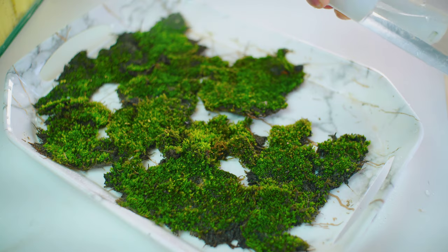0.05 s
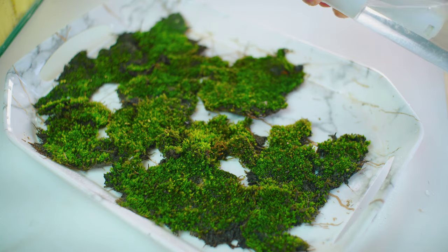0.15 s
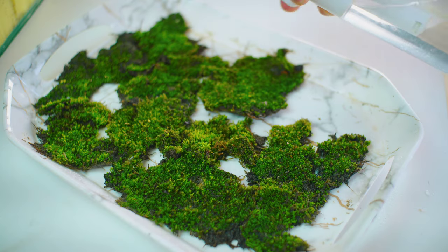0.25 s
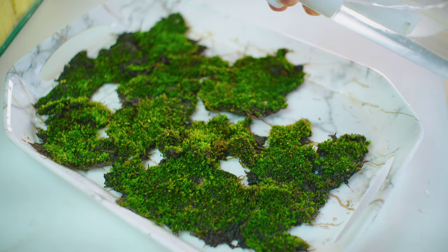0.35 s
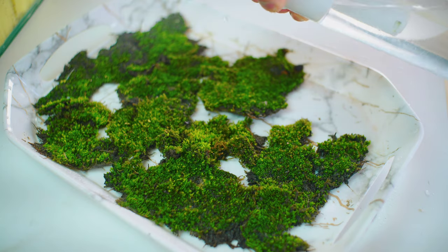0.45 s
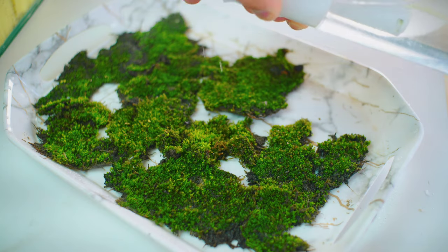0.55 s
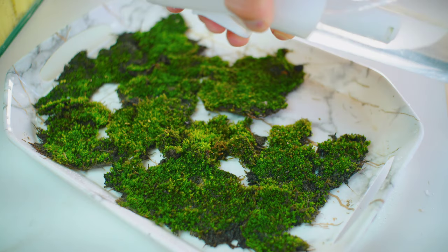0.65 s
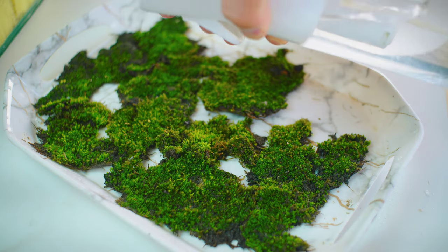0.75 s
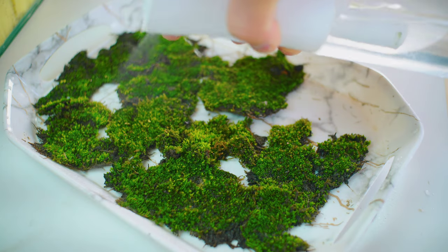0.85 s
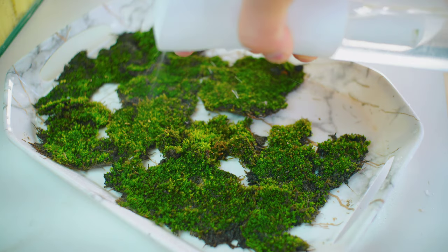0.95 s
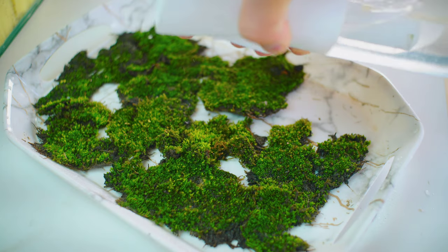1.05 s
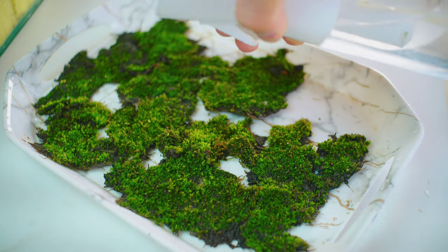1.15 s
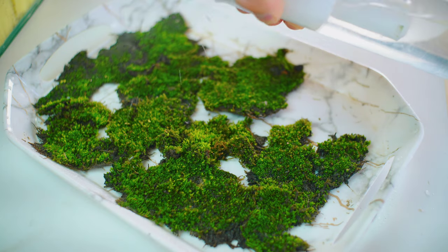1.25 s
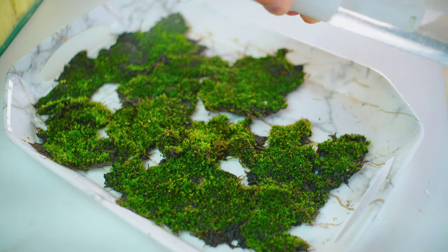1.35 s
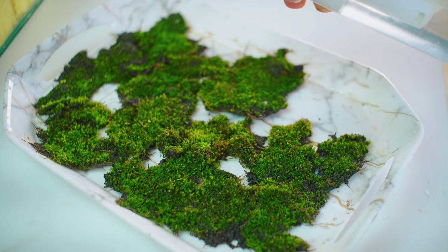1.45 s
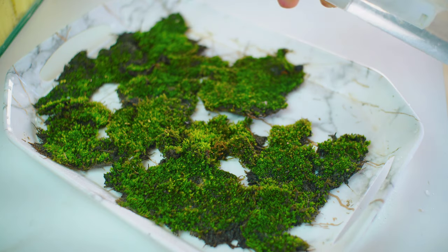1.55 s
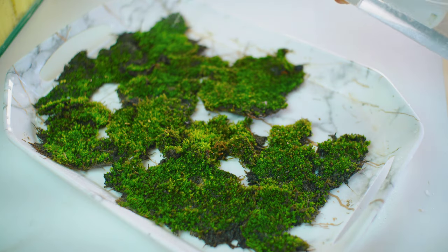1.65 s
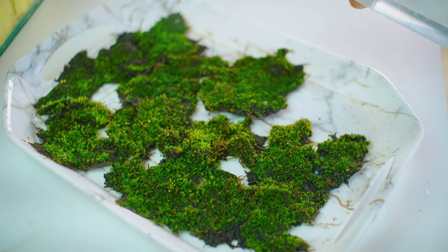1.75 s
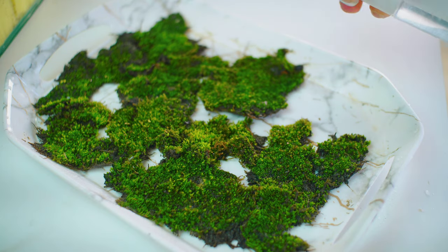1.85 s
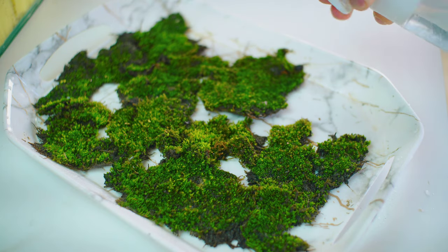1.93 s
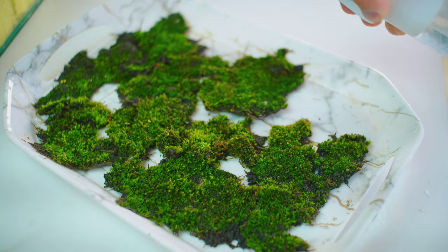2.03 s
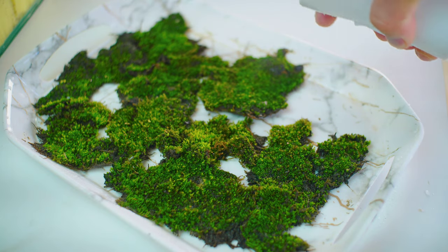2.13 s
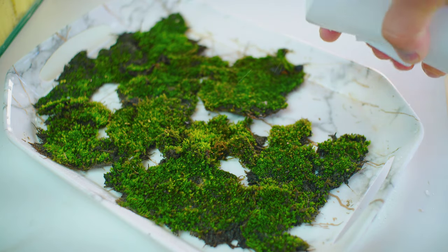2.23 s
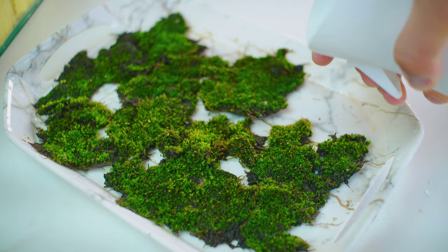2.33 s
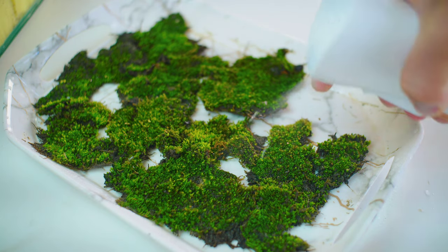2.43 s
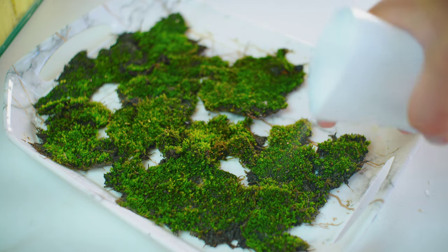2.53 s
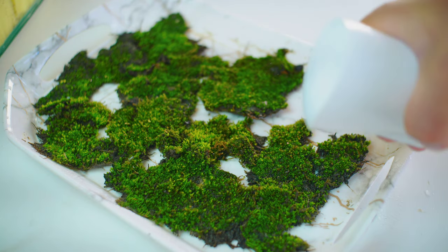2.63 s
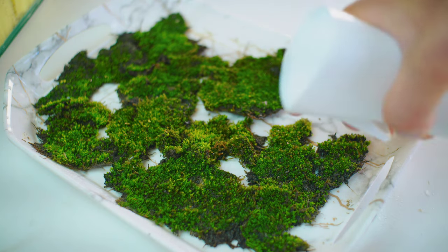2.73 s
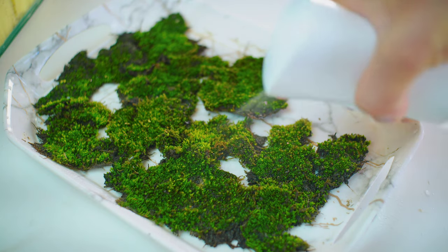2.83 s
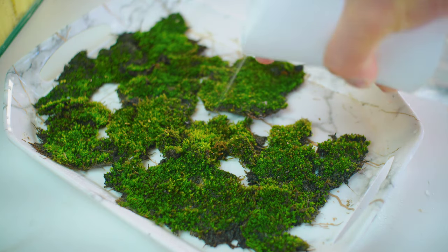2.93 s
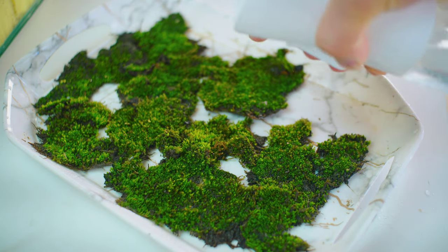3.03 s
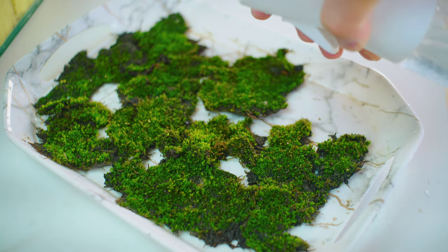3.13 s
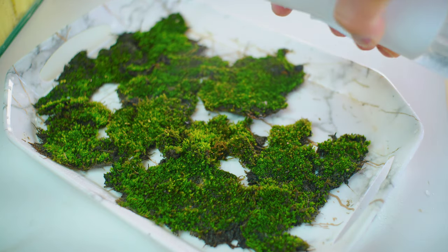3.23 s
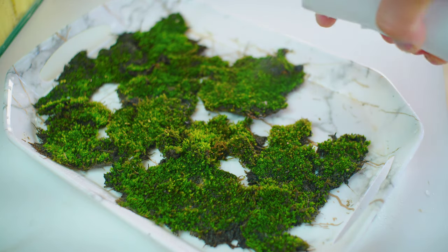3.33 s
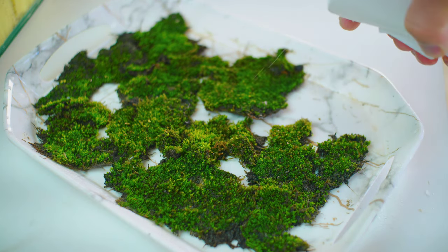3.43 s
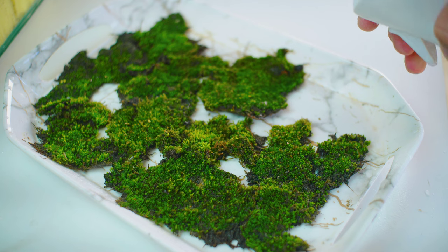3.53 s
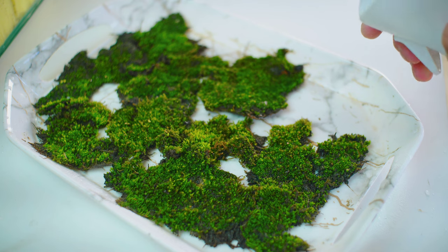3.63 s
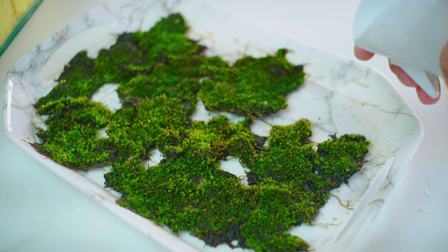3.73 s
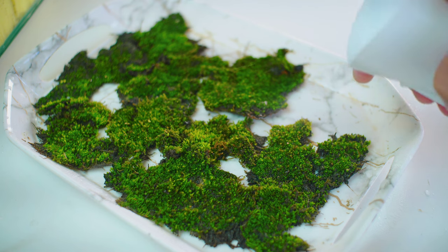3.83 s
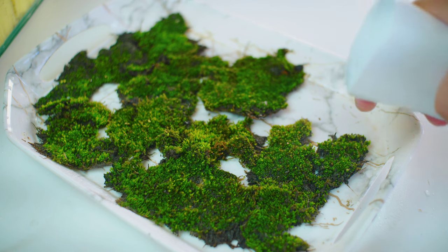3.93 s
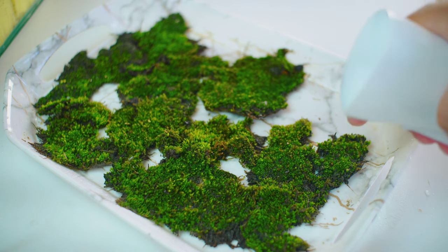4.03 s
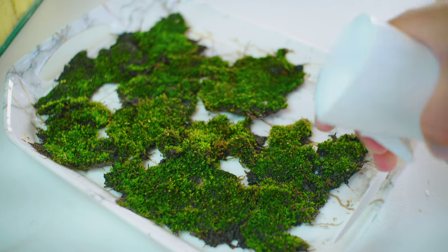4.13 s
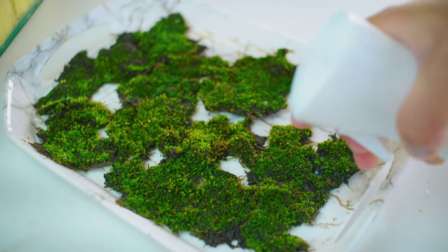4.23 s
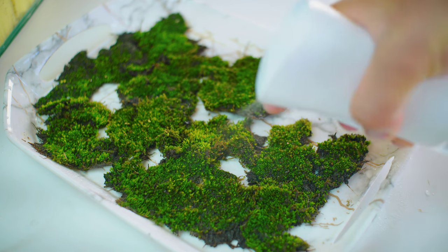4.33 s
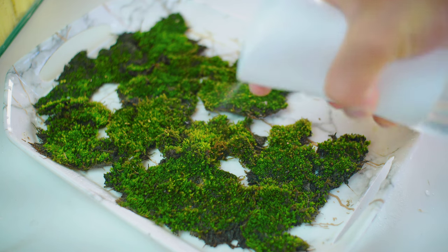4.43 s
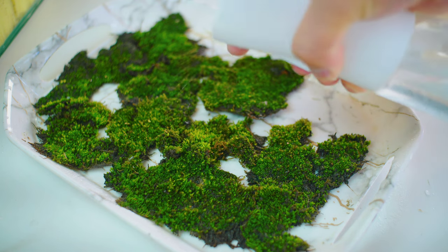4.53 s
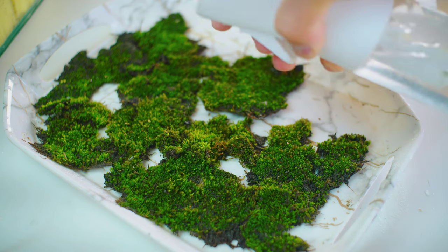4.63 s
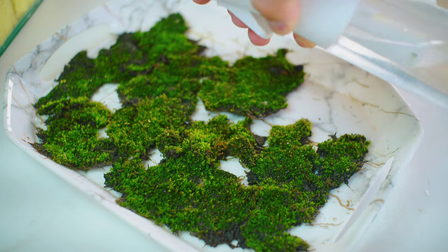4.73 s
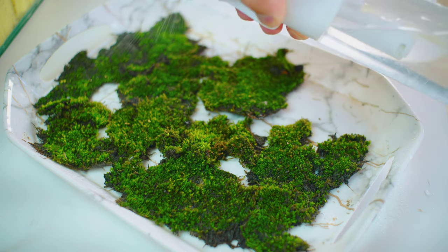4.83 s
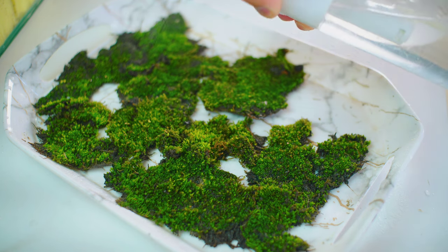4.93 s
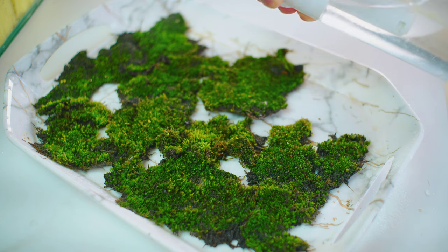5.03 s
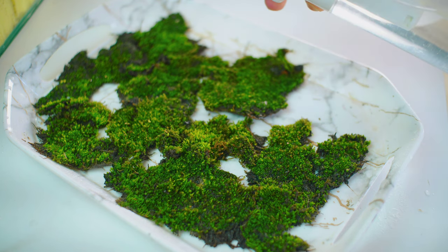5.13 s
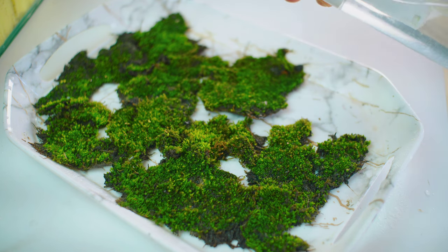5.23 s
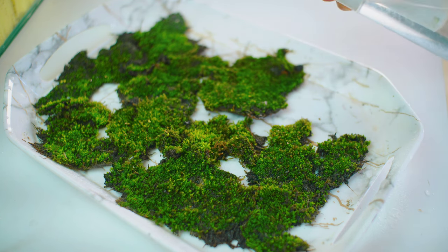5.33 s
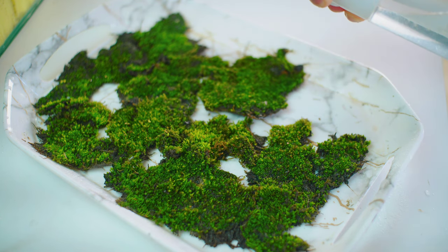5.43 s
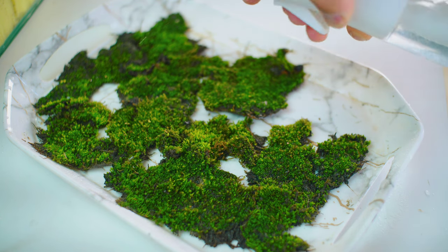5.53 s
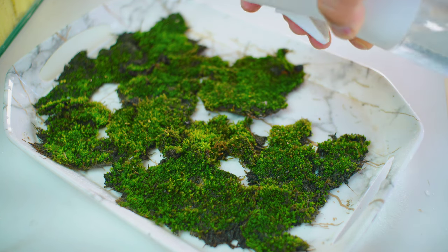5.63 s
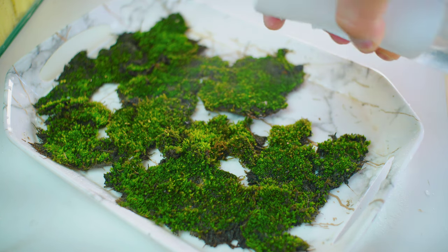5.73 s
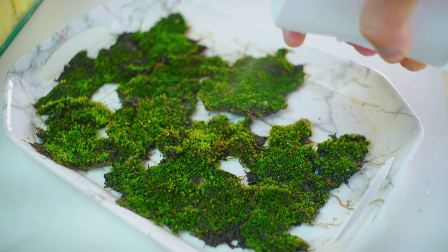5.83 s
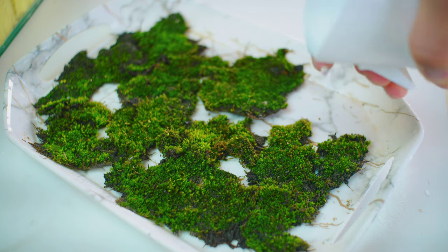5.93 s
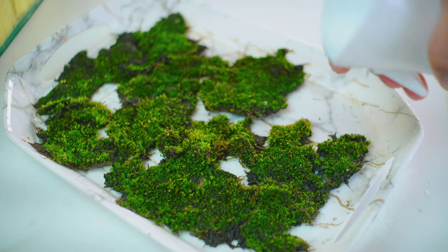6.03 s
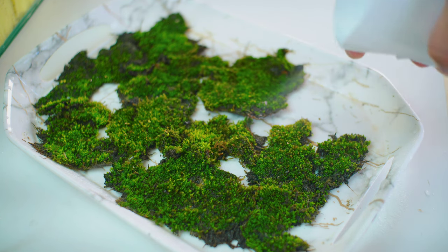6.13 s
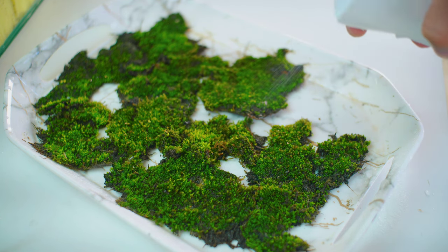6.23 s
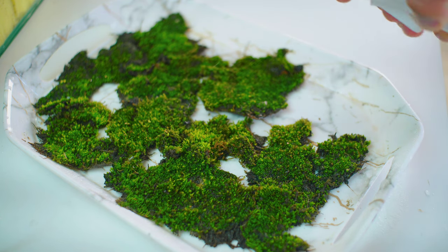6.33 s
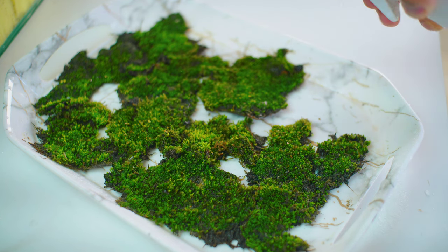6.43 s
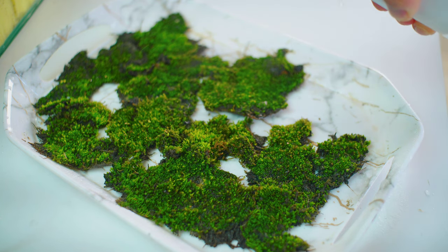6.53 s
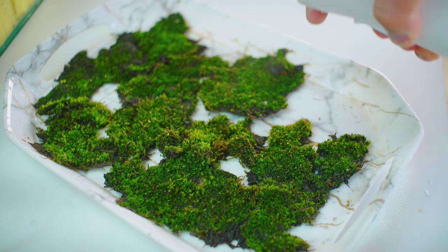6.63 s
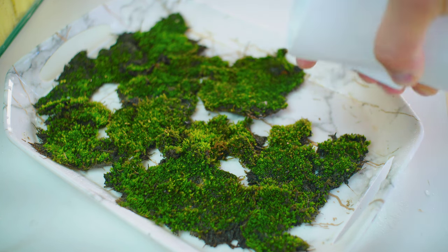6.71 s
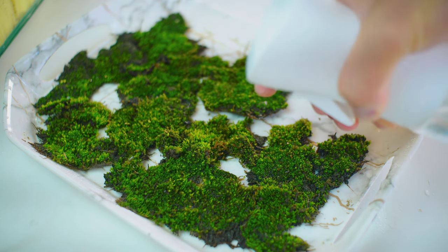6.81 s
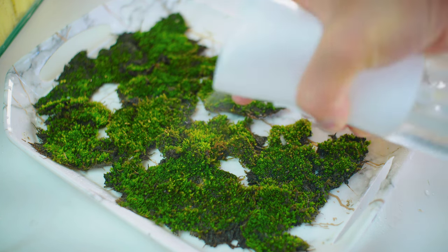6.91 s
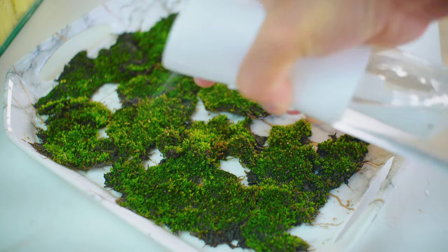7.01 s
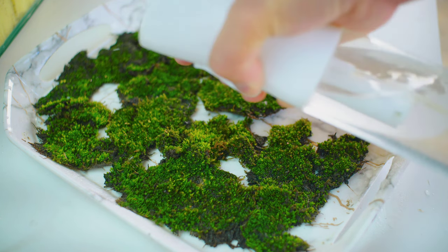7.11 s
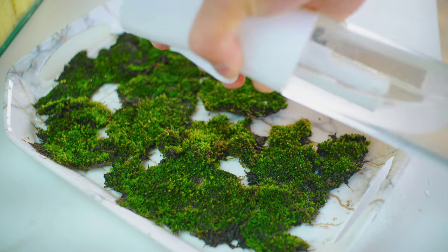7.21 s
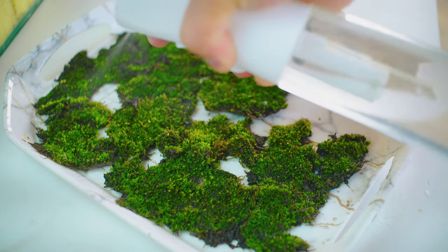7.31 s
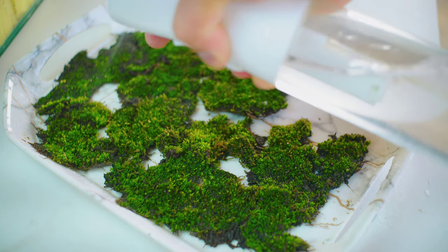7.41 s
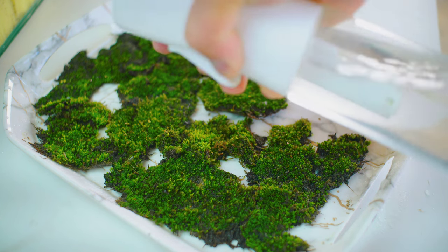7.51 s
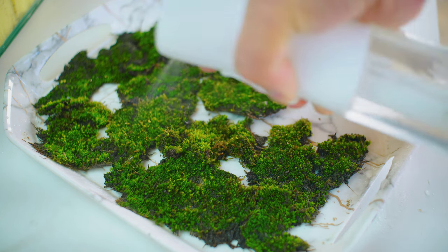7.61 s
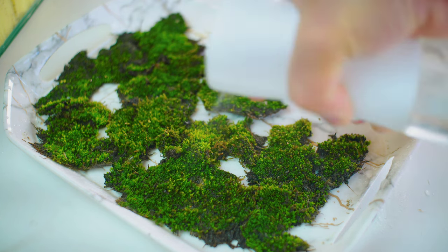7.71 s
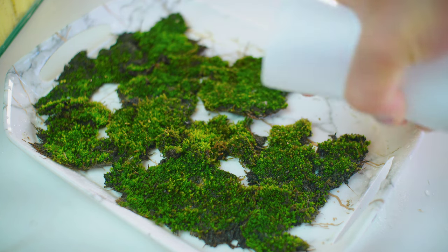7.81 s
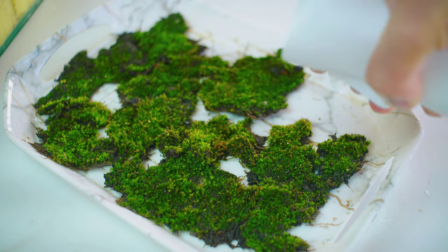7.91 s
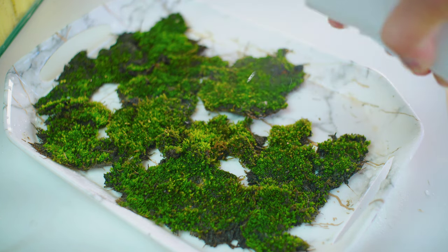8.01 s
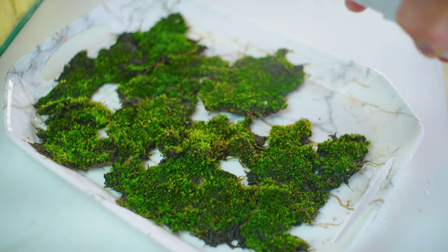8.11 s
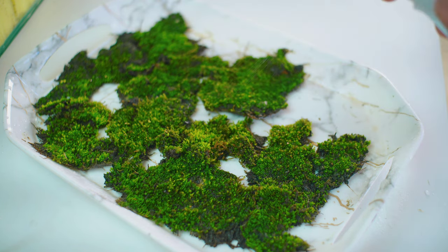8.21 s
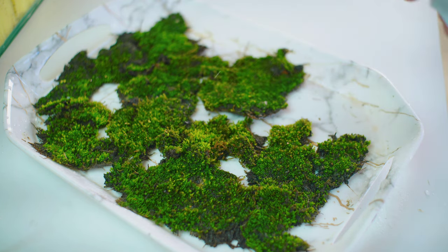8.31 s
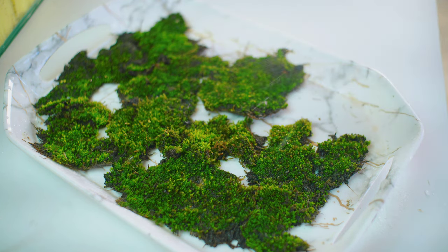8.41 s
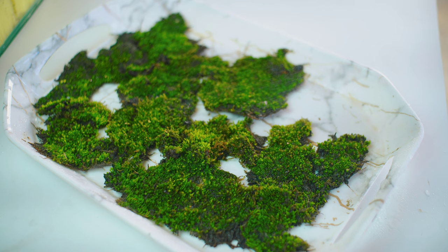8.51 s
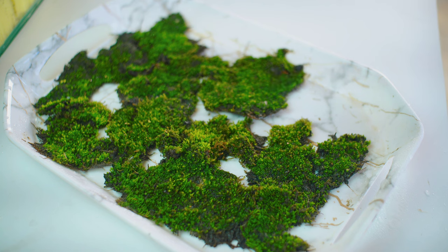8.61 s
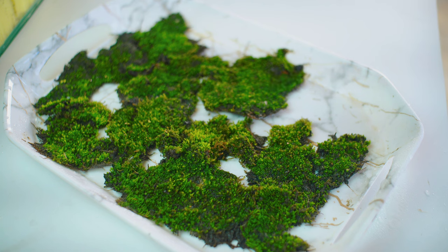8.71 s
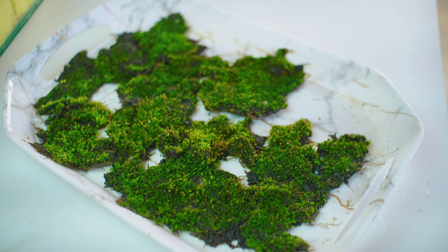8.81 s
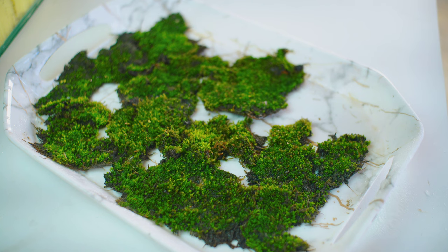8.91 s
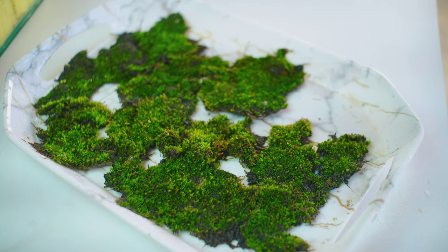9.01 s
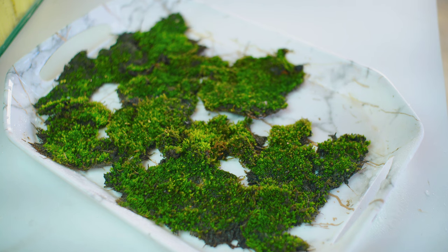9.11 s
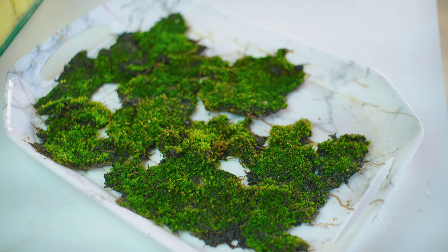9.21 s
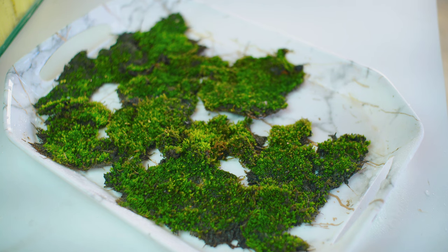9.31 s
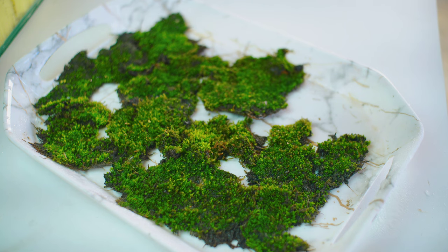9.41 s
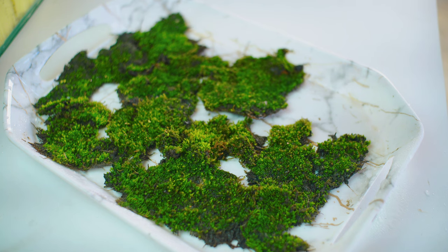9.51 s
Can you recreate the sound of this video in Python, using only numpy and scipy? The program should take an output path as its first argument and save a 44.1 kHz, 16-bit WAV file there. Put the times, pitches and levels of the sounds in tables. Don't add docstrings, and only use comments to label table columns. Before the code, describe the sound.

In a quiet room, a plastic trigger sprayer mists moss close to a stereo microphone. After an abrupt start, a weaker squirt comes at 0.1 seconds, then fuller ones about every 0.4 seconds until 3.3. Each opens with a short chirping squeal, mostly rising, sometimes falling, and bursts into bright hiss with fine droplet patter; release brings a small wheeze and tick. Hard plastic knocks stand out near 2.4 and 2.8, with sharp snaps at 0.5, 1.5 and 2.7. From 3.3 to 5.3 the squirts are longer and more widely spaced, with hollow gurgling, sliding bubbles and a knock at 4.2. The quicker pace resumes until the last squirt at 8.5, with crisp snaps near 7.5 and 7.9. A faint bubbly gurgle follows at 8.9, a weak knock at 9.0, then slight hand ticks around 9.4 over soft, diffuse room hush.

```python
import sys
import numpy as np
from scipy import signal
from scipy.fft import rfft, irfft, next_fast_len
from scipy.io import wavfile
from scipy.ndimage import uniform_filter1d

SR = 44100
rng = np.random.default_rng(int(sys.argv[2]) if len(sys.argv) > 2 else 0)


def field_ratio(decibels):
    return 10 ** (np.asarray(decibels, dtype=float) / 20)


def pcm_store(signal):
    levels = np.round(np.clip(np.atleast_2d(signal), -1, 1) * 32767)
    wavfile.write(sys.argv[1], SR, levels.astype(np.int16).T)


N = 421596

# t/s, jet level/dB, fine mist level/dB, length/s, bend (1 sags evenly, 2 holds then drops)
SQUEEZES = [(0.118, -40.5, -43.5, 0.2, 1.96), (0.478, -34, -36.5, 0.24, 2), (0.902, -33.5, -36, 0.2, 2),
            (1.315, -32, -36, 0.21, 2.3), (1.718, -34, -36, 0.21, 2.2), (2.115, -33.5, -39, 0.18, 2.95),
            (2.488, -35, -39, 0.2, 3.6), (2.888, -33, -36, .2, 2.4), (3.28, -32.5, -33, 0.26, 1.4),
            (3.902, -33.5, -34, 0.28, 1.05), (4.402, -32, -33.5, 0.3, 1.11),
            (4.908, -31.5, -36, 0.29, 1.22), (5.348, -32, -36, 0.28, 1.54), (5.766, -33, -35, 0.24, 1.67),
            (6.158, -34.5, -32.5, 0.29, 1.26), (6.563, -32, -34, 0.27, 1.3),
            (6.947, -34.5, -36.5, 0.22, 2.03), (7.337, -33, -35, 0.31, 1.12), (7.71, -33, -36, 0.25, 1.41),
            (8.087, -34, -40, 0.24, 1.87), (8.47, -32, -32.5, 0.22, 1.35)]
# t/s, level/dB, fade/s, dribble left/dB
RELEASES = [(.331, -39.5, 0.044, -52.5), (0.737, -41, 0.044, -52), (1.155, -42, 0.09, -55.5),
            (1.56, -41.5, 0.041, -49.5), (1.959, -41, 0.045, -53), (2.339, -45, 0.032, -61),
            (2.387, -54.5, 0.087, -52), (2.735, -40.5, 0.031, -55), (2.787, -47, 0.072, -50),
            (3.115, -38.5, 0.067, -55.5), (3.57, -48.5, 0.069, -59.5), (4.2, -61, 0.21, -78),
            (4.693, -45.5, 0.088, -63), (5.183, -46, 0.019, -57.5), (5.714, -53, .022, -69),
            (6.09, -56, 0.049, -63), (6.451, -41.5, 0.019, -56), (6.83, -46, 0.037, -59),
            (6.9, -52, 0.03, -70), (7.211, -42.5, 0.032, -53), (7.62, -49, 0.027, -55),
            (7.948, -40.5, 0.06, -54), (8.337, -43, 0.093, -55), (8.697, -41.5, 0.025, -55),
            (8.8, -60.5, .3, -63)]
# f/Hz, level/dB per Hz
JET_COLOUR = [(180, -31), (300, -14.5), (530, -15.5), (629, -15), (790, -9), (977, -12.5), (1590, -3.5),
              (2050, -0.5), (3140, 0), (3620, -1.5), (4610, 0.5), (7270, -7.5), (9000, -14), (11700, -21.5),
              (19800, -120)]
# f/Hz, level/dB per Hz
MIST_COLOUR = [(5000, -13.5), (7500, 6), (9000, 1.5), (11500, 0.5), (14500, -2), (15600, 1), (16500, -22)]
# t/s, peak level/dB
SPITS = [(1.697, -26.5), (2.088, -29), (2.473, -27), (2.8628, -25.5), (3.886, -23), (4.3943, -27),
         (4.8944, -25.5), (5.756, -24), (6.1443, -18), (6.937, -29), (7.319, -30), (8.07, -24)]
DROPLET_PITCHES = [1600, 2070, 3200, 4300, 5050]
# t/s, peak level/dB, f/Hz
SHORT_RINGS = [(.513, -31, 1680), (.924, -27, 5340), (1.327, -13, 6450), (1.349, -29, 2540),
               (1.355, -28, 2410), (1.42, -18, 7100), (1.713, -11, 4600), (2.137, -25, 2270),
               (2.1367, -18, 5300), (2.173, -28, 7060), (2.526, -25, 2230), (2.914, -25, 2220),
               (2.978, -23, 5700), (3.312, -29, 2240), (3.361, -29, 1720), (4.434, -31, 1670),
               (4.434, -16, 5000), (4.93, -31, 1730), (4.938, -24, 1730), (4.94, -22, 4630),
               (5.384, -30, 2070), (6.192, -31, 2270), (6.582, -26, 2240), (6.599, -27, 2360),
               (6.982, -24, 1810), (7.026, -27, 3250), (7.419, -36, 1510), (7.739, -29, 2340),
               (7.764, -29, 2370), (7.804, -36, 2070), (8.115, -27.5, 1600), (8.151, -24, 6250),
               (8.476, -21, 2700), (8.493, -31, 1490), (.843, -38, 2650), (4.665, -33, 4640),
               (4.684, -44, 1600), (6.904, -33, 2670), (8.042, -30, 2690), (5.162, -40, 1950),
               (6.867, -40, 1870), (8.84, -47, 2700), (7.9112, -28, 5250), (8.423, -38, 1600),
               (7.634, -42, 1330), (9.502, -55, 960), (4.2515, -38, 2560), (6.03, -41, 1780),
               (7.197, -36, 2690), (3.102, -37, 2980)]
# t/s, peak level/dB, length/s, start f/Hz, end f/Hz
RISING_SQUEALS = [(0.079, -24, 0.0057, 4900, 5350), (0.4555, -13, 0.018, 2072, 2660),
                  (0.8785, -13, 0.013, 1492, 2880), (1.294, -13.5, 0.016, 1434, 2770),
                  (1.691, -11.5, 0.012, 1600, 3150), (1.698, -17.5, 0.016, 4300, 4770),
                  (2.861, -23, 0.0037, 4170, 4400), (3.876, -30, 0.005, 5180, 5260),
                  (4.385, -12.5, 0.013, 1550, 3200), (4.8855, -13.5, 0.018, 1440, 3650),
                  (5.329, -13, 0.01, 1838, 3120), (5.746, -13, 0.013, 1987, 2700),
                  (6.139, -18.5, 0.0155, 3336, 4840), (6.547, -13.5, 0.015, 1764, 2960),
                  (6.93, -20, 0.017, 2865, 3410), (7.316, -14.5, 0.0099, 1730, 2720),
                  (7.687, -12, 0.012, 2154, 2130), (8.442, -13.5, 0.029, 2497, 2917)]
# t/s, peak level/dB, length/s, start f/Hz, end f/Hz
FALLING_SQUEALS = [
    (0.891, -14.5, 0.011, 2750, 1650),
    (3.256, -15, 0.013, 3120, 2200),
    (5.338, -10, 0.0062, 3020, 2120),
    (2.088, -12.5, 0.0083, 5560, 4670),
    (2.095, -13.5, 0.011, 3630, 2600),
    (2.474, -16.5, 0.01, 3550, 3200),
    (2.873, -16, 0.0108, 5680, 3200),
    (3.886, -17, 0.013, 7150, 2310),
    (7.323, -14.5, 0.0124, 4970, 3480),
    (8.0684, -17, 0.011, 4760, 4580),
]
# f/Hz, width/Hz, level/dB
NOZZLE_MODES = [(2600, 1670, -10), (4730, 750, -1.5), (6370, 610, -6), (7100, 320, -6.5), (9200, 2500, -10)]
# t/s, peak level/dB, f/Hz
WHISTLES = [(0.456, -25, 7230), (0.886, -20.5, 5200), (4.896, -29.5, 4700), (2.474, -37, 7870),
            (3.262, -22.5, 6430), (3.261, -24, 5050), (3.886, -28.5, 7640), (4.385, -24.5, 4800),
            (5.749, -24.5, 5060), (6.149, -21, 4820), (6.552, -22.5, 6860), (6.934, -22, 3330),
            (6.933, -24, 5140), (7.319, -32, 6540), (7.692, -23, 6680), (8.449, -20.5, 7100)]
# t/s, peak level/dB, swell/s, fade/s
GULPS = [(0.036, -54.5, 0.008, 0.46), (.364, -48, 0.097, 0.13), (.466, -47.5, 0.068, 0.13),
         (.743, -54.5, 0.12, 0.083), (.891, -51, 0.026, .15), (1.316, -47, 0.35, 0.068),
         (1.705, -50.5, 0.33, 0.36), (2.152, -51.5, 0.94, 0.13), (2.374, -44.5, 0.1, 0.56),
         (2.79, -36, 0.016, 0.21), (2.855, -36.5, 0.067, 0.14), (3.2, -49.5, 0.18, 0.47),
         (3.359, -45, .2, 0.077), (3.641, -47.5, 0.17, 0.2), (3.877, -43.5, 0.0037, 0.13),
         (4.203, -45.5, 0.0061, 0.1), (4.27, -44, 0.094, 0.15), (4.459, -43, 0.051, 0.051),
         (4.732, -45.5, 0.081, 0.3), (4.91, -50, .1, 0.13), (5.236, -47, 0.065, 0.31),
         (5.714, -41.5, 0.14, 0.17), (6.151, -44, 0.14, 0.23), (6.53, -51.5, 0.23, 0.65),
         (6.869, -41, 0.0089, 0.22), (7.348, -50.5, 0.19, 0.13), (7.7, -50.5, 0.14, 0.16),
         (8.1, -43, 0.26, 0.064), (8.51, -49.5, 0.18, 0.33), (8.96, -54, 0.22, 0.083)]
# f/Hz, width/Hz, level/dB
CHAMBER_MODES = [(884, 83, 4), (1600, 350, -11.5), (1940, 300, -7), (3410, 300, -10.5), (4500, 1800, -28)]
# t/s, peak level/dB
BUBBLE_BURSTS = [(0.354, -49), (0.885, -43), (1.699, -48), (1.982, -41.5), (2.089, -47), (2.424, -39.5),
                 (2.478, -35), (2.794, -37), (2.865, -45), (2.939, -44), (2.976, -42), (3.265, -42),
                 (3.818, -66), (3.877, -40), (4.256, -42), (4.275, -41), (4.296, -42), (4.362, -39),
                 (4.394, -40), (4.454, -38), (4.74, -42), (4.897, -42), (5.228, -45), (5.341, -43),
                 (5.63, -44), (5.657, -41), (5.919, -44.5), (6.036, -49), (6.122, -46), (6.502, -44),
                 (6.557, -43), (6.625, -38), (6.718, -42), (6.868, -38), (6.94, -34), (7.115, -42),
                 (7.328, -39), (7.496, -46), (7.69, -40), (7.859, -42), (8.009, -43), (8.253, -46),
                 (8.447, -43), (8.908, -43)]
# t/s, peak level/dB, length/s, start f/Hz, end f/Hz
SLIDING_BUBBLES = [(3.6, -49, .032, 820, 920), (3.632, -49, .086, 940, 590), (3.66, -52, .035, 920, 880),
                   (4.322, -52, .05, 2250, 1200), (4.775, -49, .015, 1600, 1500),
                   (4.808, -47, .025, 1520, 1500), (8.866, -48, .014, 1400, 1300),
                   (8.866, -56, .03, 3400, 3250), (8.89, -45, .047, 1280, 880),
                   (8.917, -51, .018, 1480, 1300), (8.953, -53, .04, 980, 930)]
# t/s, length/s, level/dB
REFILL_SPITS = [
    (0.427, 0.016, -49.5),
    (3.6, 0.089, -57),
    (4.222, 0.092, -55.5),
    (4.742, 0.097, -57),
    (5.232, 0.12, -61),
    (6.82, 0.16, -63),
]
# f/Hz, level/dB per Hz
REFILL_COLOUR = [(4300, -66), (5300, 14), (7300, 9), (8300, -59)]
# t/s, peak level/dB, hollow ring relative level/dB
KNOCKS = [
    (2.375, -9.5, 7),
    (2.7714, -10.5, 6.5),
    (3.819, -42, 18),
    (4.206, -17.5, 10.5),
    (6.071, -23, 9),
    (9.022, -37, 11),
]
# f/Hz, width/Hz, level/dB
HOUSING_MODES = [(917, 60, -14.5), (2130, 170, -2), (2970, 170, -2), (3460, 690, -10.5), (4700, 1200, -9)]
# t/s, peak level/dB, f/Hz, t60/s
SNAPS = [(0.4834, -9.5, 7600, 0.004), (1.492, -8.5, 4700, 0.0023), (2.6848, -8.5, 5380, 0.0028),
         (4.739, -29, 1160, 0.0073), (5.229, -32, 1300, 0.0055), (5.229, -32, 2900, 0.0054),
         (7.369, -21, 1600, 0.015), (7.378, -30, 1600, 0.012), (7.5485, -9, 4210, 0.0059),
         (7.549, -14, 2080, 0.0029), (7.8961, -3.5, 3700, 0.0027), (7.895, -18, 5030, .005),
         (7.896, -31, 490, 0.02), (7.898, -37, 320, 0.037)]
# t/s, peak level/dB, centre f/Hz
SLIPS_BACK = [(0.3324, -37, 3150), (0.736, -41, 3800), (1.55, -46, 2930), (1.944, -42.5, 3200),
              (2.73, -43, 2500), (3.547, -44, 2300), (4.6104, -39.5, 7160), (4.7382, -40.5, 1730),
              (4.7696, -42, 2590), (5.229, -51, 1950), (5.6558, -43, 1900), (6.4117, -42.5, 3920),
              (8.329, -44, 4300), (8.6843, -39.5, 3820), (8.824, -49.5, 2600), (5.708, -46, 2500)]
# t/s, peak level/dB, centre f/Hz
SLACK_TAKEN = [(0.828, -45.5, 2360), (1.257, -43.5, 2600), (1.652, -43, 2650), (2.051, -44.5, 2780),
               (2.494, -42, 3300), (3.2153, -46, 2380), (5.259, -42.5, 2780), (5.3842, -30.5, 3750),
               (6.5243, -42, 2520), (6.8982, -56, 2640), (7.285, -42.5, 2660), (7.651, -46, 1860),
               (8.4244, -44, 2760), (8.491, -32, 4000)]
# t/s, peak level/dB
CREAKS = [(0.8016, -29), (1.1484, -22), (4.6872, -30), (4.7686, -28), (5.5887, -35), (5.6113, -19),
          (5.8804, -17), (6.4428, -27), (6.8644, -43), (7.651, -16), (8.3283, -19)]
# t/s, peak level/dB
SEAL_PUFFS = [(0.7287, -49), (0.8265, -41), (0.8515, -42), (1.256, -37), (1.5504, -32), (1.6501, -37),
              (1.942, -32), (2.0492, -33), (2.3231, -44), (2.4443, -42), (2.7282, -41), (3.1016, -37),
              (3.2141, -39), (3.598, -31), (3.6114, -38), (3.6274, -39), (3.6511, -31), (3.673, -38),
              (3.719, -41), (3.7474, -40), (3.7614, -46), (4.212, -43), (4.2243, -42), (4.2404, -39),
              (4.2517, -40), (4.2824, -46), (4.291, -36), (4.3054, -47), (5.1731, -50), (5.2577, -30),
              (5.5882, -46), (5.7024, -38), (6.067, -38), (6.41, -36), (6.4418, -49), (6.5226, -36),
              (6.795, -44), (6.8199, -40), (6.8693, -42), (6.898, -31), (7.198, -45.5), (7.281, -32),
              (7.9309, -37), (8.029, -36), (8.0414, -38), (8.686, -33),
              (0.331, -41),
    (4.3716, -38),
    (6.128, -36),
    (7.651, -40),
    (8.051, -44),
    (8.4238, -30),
]
# t/s, peak level/dB
HAND_TICKS = [
    (8.727, -31),
    (9.005, -55),
    (9.397, -37.5),
    (9.499, -41),
]
# t/s, left-right level/dB
HAND_DRIFT = [(0, 0.8), (2, 0), (9, 0.1)]
# f/Hz, likeness
NEAR_ALIKE = [(140, .995), (300, 1), (800, 0.99), (1600, 1), (3000, 0.95), (6000, 0.79), (10000, 0.46),
              (15000, 0.2)]
# f/Hz, likeness
HUSH_ALIKE = [(100, 0.93), (250, 0.97), (1000, 0.42), (15000, 0.092)]
# f/Hz, t60/s
ROOM_DECAY = [(300, 0.12), (2000, 0.89), (10000, 0.039)]
# f/Hz, level/dB per Hz
HUSH_COLOUR = [(15, -49), (25, -14), (60, -50), (110, -26.5), (202, -18), (280, -13.5), (388, -8),
               (470, -10), (538, -6), (3510, -6), (13300, -18.5), (16500, -29)]
# f/Hz, level/dB
MICROPHONE = [(60, -35), (300, -14), (700, -3), (15300, 2), (16200, -29), (17000, -50)]
# t/s, level/dB
WAKE = [(0, -120), (.031, -120), (.032, -2.5), (.088, -4), (.098, -21), (.12, -10.5), (.2, 0), (10, 0.5)]

OPEN_S = 0.034
RING_RISE_S = 0.001204


def spray():
    jet_db, mist_db = pressure()
    spits = np.zeros(N)
    t = np.arange(SR // 20) / SR
    for s, db in SPITS:
        add(spits, s, field_ratio(db - 4.5 - 60 * t / 0.045))
    sputter_db = 1.3 * wobble(120)
    drops = patter(rate=110, sharpness=4.5)
    jet = rush(JET_COLOUR, patchy_db=2.5, lumpy_db=1.0)
    jet = jet + field_ratio(-6.5) * spread(np.array([drops, drops]))
    mist = rush(MIST_COLOUR, patchy_db=2.5, lumpy_db=2.5) * field_ratio([[.8], [-.8]])
    mist_gain = field_ratio(mist_db - 4.0 + sputter_db) + spits
    return field_ratio(jet_db - 0.88 + sputter_db) * jet + mist_gain * mist


def pressure():
    t, level = np.arange(N) / SR, np.full((2, N), -90.0)
    wheeze_rise_s, dribble_fade_db_per_s = 0.016, 25
    for s, row in sorted([(row[0], row) for row in SQUEEZES + RELEASES]):
        if len(row) == 5:
            _, jet_db, mist_db, length, bend = row
            layers = [(OPEN_S, jet_db, -54, bend), (0.024, mist_db, -65.5, bend * 0.84)]
        else:
            _, db, length, left_db = row
            mist_left_db = max(left_db - 28.5, -69)
            layers = [(wheeze_rise_s, db, left_db, 1), (wheeze_rise_s, db - 14.5, mist_left_db, 1)]
        for track, (rise, top_db, end_db, bend) in zip(level, layers):
            at = round((s - rise) * SR)
            since = t[at:at + SR] - s
            opening = track[at] + (top_db - track[at]) * (1 + since / rise)
            sag = top_db + (end_db - top_db) * np.clip(since / length, 0, 1) ** bend
            dribble = dribble_fade_db_per_s * np.maximum(since - length, 0)
            track[at:at + SR] = np.where(since < 0, opening, sag - dribble)
    return level


def rush(spectrum, patchy_db, lumpy_db):
    lumpy = rng.standard_normal((2, N)) * field_ratio(lumpy_db * wobble(700))
    z = signal.stft(lumpy, nperseg=256)[2]
    field = rng.standard_normal(z.shape[1:])
    field = uniform_filter1d(field, size=3, axis=0)
    field = uniform_filter1d(field, size=12, axis=1)
    pair = signal.istft(z * field_ratio(patchy_db * unit(field)), nperseg=256)[1][:, :N]
    return unit(spread(pair, lambda hz: field_ratio(along(spectrum, hz))))


def patter(rate, sharpness):
    out = np.zeros(N)
    for hz in DROPLET_PITCHES:
        hits = (rng.random(N) < rate / SR) * np.clip(rng.standard_normal(N), -2, 2)
        out += unit(signal.lfilter(*signal.iirpeak(hz, sharpness, SR), hits))
    return unit(out)


def pings(rows, gain_db, cycles, rise):
    out, t = np.zeros(N), np.arange(SR // 20) / SR
    for s, db, hz in rows:
        u = t * hz / cycles
        tone = np.sin(2 * np.pi * hz * t * (1 + 0.042 * u))
        add(out, s - RING_RISE_S, field_ratio(db + gain_db - 60 * u) * (1 - np.exp(-t / rise)) * tone)
    return out


def squeals():
    out = np.zeros(N)
    chatter = field_ratio(3 * np.clip(wobble(330), -2, 1))
    for s, db, length, start_hz, end_hz in sorted(RISING_SQUEALS + FALLING_SQUEALS):
        phase, u = glide(length, start_hz, end_hz, jitter=0.25)
        buzz = np.sin(phase) + 0.23 * np.sin(2 * phase) + 0.16 * np.sin(3 * phase)
        air = 2.27 * rng.standard_normal(len(u)) * (1 + np.sin(phase))
        skew = 1.1 if end_hz > start_hz else 0.6
        swell = np.sin(np.pi * u ** skew) ** 0.55
        share = np.clip(0.2 + 0.035 * (-12 - db), 0, 1)
        rough = unit(chatter[round(s * SR):][:len(u)])
        add(out, s, field_ratio(db + 2.0) * swell * rough * ((1 - share) * buzz + share * air))
    return filtered(out, lambda f: resonances(NOZZLE_MODES)(f) / (1 + (f / 9000) ** 8))


def whistles():
    out = np.zeros(N)
    for s, db, hz in WHISTLES:
        phase, u = glide(0.012, 1.02 * hz, 0.98 * hz, jitter=0.2)
        add(out, s, field_ratio(db) * np.sin(np.pi * u ** 0.43) * np.sin(phase))
    return out


def chamber():
    air = rng.standard_normal(N) * field_ratio(5 * wobble(45))
    fill = np.pi / 4 * (1 + np.clip(wobble(14), -1, 1))
    low, high = [filtered(air, resonances([(c * k, w, db) for c, w, db in CHAMBER_MODES]))
                 for k in (0.96, 1.035)]
    suction = gulps() * unit(np.cos(fill) * low + np.sin(fill) * high)
    bursts = [(s, db, 909 * rng.normal(1, 0.043)) for s, db in BUBBLE_BURSTS]
    bubbles = pings(bursts, gain_db=10, cycles=23.7, rise=0.0021)
    return suction + bubbles + sliding_bubbles() + refill_spits()


def gulps():
    t, level = np.arange(N) / SR, np.full(N, -120.0)
    for s, db, swell, fade in GULPS:
        near = slice(max(round(s * SR) - SR, 0), round(s * SR) + SR)
        away = np.maximum((s - t[near]) / swell, (t[near] - s) / fade)
        level[near] = np.maximum(level[near], db - 14 * away)
    return field_ratio(level)


def sliding_bubbles():
    out = np.zeros(N)
    for s, db, length, start_hz, end_hz in SLIDING_BUBBLES:
        phase, u = glide(length, start_hz, end_hz, jitter=0.17)
        breath = 1 + 3.5 * uniform_filter1d(rng.standard_normal(len(u)), size=120)
        add(out, s, field_ratio(db) * np.sin(np.pi * u) ** 0.083 * breath * np.sin(phase))
    return out


def refill_spits():
    out = np.zeros(N)
    flutter = np.cos(np.cumsum(2 * np.pi * (60 + 18 * wobble(40)) / SR))
    puffs = field_ratio(3 * flutter + 3 * wobble(60))
    hiss = filtered(rng.standard_normal(N), lambda hz: field_ratio(along(REFILL_COLOUR, hz)) * puffs_free(hz))
    spit = unit(filtered(rng.standard_normal(N) * 0 + hiss, lambda hz: 1) * puffs)
    for s, length, db in REFILL_SPITS:
        add(out, s, field_ratio(db) * spit[round(s * SR):][:round(length * SR)])
    return out


def puffs_free(hz):
    return np.ones_like(hz)


def knocks():
    out, t = np.zeros(N), np.arange(SR // 10) / SR
    f = np.fft.rfftfreq(len(t), 1 / SR)
    (hz, width, level), *walls = HOUSING_MODES
    for s, db, hollow_db in KNOCKS:
        blow = field_ratio(-60 * t / 0.00055) + 0.082 * field_ratio(-60 * t / 0.027) * rng.standard_normal(len(t))
        modes = [(hz, width, level + hollow_db + 14)]
        modes += [(c * rng.normal(1, 0.02), w, g) for c, w, g in walls]
        body = resonances(modes)(f) * (f / (f - 560j)) ** 4 / (1 + 1j * f / 7000) ** 2
        ring = irfft(rfft(blow) * body)
        add(out, s, field_ratio(db) * ring / np.abs(ring).max())
    return out


def scuffs(rows, t60):
    out, t = np.zeros(N), np.arange(SR // 10) / SR
    for s, db, hz in rows:
        band_hz = [hz / 1.08, min(hz * 1.1, 0.45 * SR)]
        scuff = signal.lfilter(*signal.butter(2, band_hz, "bandpass", fs=SR), rng.standard_normal(len(t)))
        scuff = scuff * field_ratio(-60 * t / t60) * (1 - np.exp(-t / 0.00014))
        add(out, s - 0.001, field_ratio(db + 8.5) * scuff / np.abs(scuff).max())
    return out


def snaps():
    out, t = np.zeros(N), np.arange(SR // 10) / SR
    for s, db, hz, t60 in SNAPS:
        snap = field_ratio(db - 60 * t / t60) * (1 - np.exp(-t / 0.00022)) * np.sin(2 * np.pi * hz * t)
        add(out, s, signal.lfilter(*signal.butter(2, [hz / 2, hz * 1.8], "bandpass", fs=SR), snap))
    return out


def creaks(rows, gain_db, t60, band_hz):
    out, t = np.zeros(N), np.arange(SR // 50) / SR
    for s, db in rows:
        fade = field_ratio(db + gain_db - 60 * t / t60)
        add(out, s, fade * (1 - np.exp(-t / 0.00079)) * rng.standard_normal(len(t)))
    return signal.lfilter(*signal.butter(3, band_hz, "bandpass", fs=SR), out)


def jolts():
    out, t = np.zeros(N), np.arange(SR // 8) / SR
    for s, jet_db, *_ in SQUEEZES:
        fade = field_ratio(jet_db - 45 + rng.normal(0, 3.3) - 60 * t / 0.055)
        add(out, s - OPEN_S / 2, fade * np.sin(2 * np.pi * 75.4 * t))
    return out


def room(x):
    hz, t, z = signal.stft(rng.standard_normal((2, SR // 4)), SR, nperseg=256)
    decay = field_ratio(-60 * t / along(ROOM_DECAY, hz)[:, None])
    tail = signal.istft(z * decay, SR, nperseg=256)[1]
    late = np.pad(x, (60, 0))[None]
    return signal.fftconvolve(late, tail / np.linalg.norm(tail[0]), axes=1)[:, :N]


def room_hush():
    noise = rng.standard_normal((2, N))
    return field_ratio(-60.5) * unit(spread(noise, lambda hz: field_ratio(along(HUSH_COLOUR, hz)), HUSH_ALIKE))


def unit(x):
    return x / np.sqrt(np.mean(x ** 2) + 1e-20)


def along(points, hz):
    f, v = np.transpose(points)
    return np.interp(np.log(hz + 1), np.log(f + 1), v)


def curve(rows):
    s, value = np.transpose(rows)
    return np.interp(np.arange(N) / SR, s, value)


def wobble(rate):
    return np.interp(np.arange(N) * rate / SR, np.arange(N // 40), rng.standard_normal(N // 40))


def filtered(x, response):
    m = next_fast_len(N + 8192)
    return irfft(rfft(x, m) * response(np.fft.rfftfreq(m, 1 / SR)), m)[..., :N]


def resonances(modes):
    return lambda f: sum((-1) ** k * field_ratio(db) * 1j * f * w / (c * c - f * f + 1j * f * w)
                         for k, (c, w, db) in enumerate(modes))


def spread(pair, colour=lambda hz: 1, alike=NEAR_ALIKE):
    def response(hz):
        turn = np.arccos(np.clip(along(alike, hz), -1, 1)) / 2
        return colour(hz) * np.array([np.cos(turn), 1j * np.sin(turn)])
    mid, side = filtered(pair, response)
    return np.array([mid + side, mid - side])


def add(track, s, sound):
    track[round(s * SR):][:len(sound)] += sound


def glide(length, start_hz, end_hz, jitter):
    u = np.linspace(0, 1, round(length * SR))
    shake = uniform_filter1d(rng.standard_normal(SR // 5), size=24)[:len(u)]
    hz = start_hz * (end_hz / start_hz) ** u * (1 + jitter * shake)
    return np.cumsum(2 * np.pi * hz / SR), u


def scene():
    bottle = squeals() + whistles() + chamber() + knocks() + snaps()
    bottle += pings(SHORT_RINGS, gain_db=5.3, cycles=36, rise=RING_RISE_S)
    bottle += scuffs(SLIPS_BACK, t60=0.028) + scuffs(SLACK_TAKEN, t60=0.033)
    bottle += creaks(CREAKS, gain_db=-4.5, t60=0.007, band_hz=[2200, 10000])
    bottle += creaks(SEAL_PUFFS, gain_db=5, t60=0.018, band_hz=[4900, 7500])
    bottle += creaks(HAND_TICKS, gain_db=0, t60=0.016, band_hz=[1800, 5800])
    drift = field_ratio(curve(HAND_DRIFT) * [[0.5], [-0.5]])
    near = (spray() + spread(np.array([bottle, bottle]))) * drift + field_ratio(-19) * room(bottle)
    return filtered(near, lambda hz: field_ratio(along(MICROPHONE, hz))) + jolts() + room_hush()


def band_limit(x):
    return signal.sosfilt(signal.butter(12, 16640, fs=SR, output="sos"), x)


def record(dry):
    mix = dry * field_ratio(curve(WAKE))
    return band_limit(mix)


dry = scene()
out = record(dry)
pcm_store(out)
```